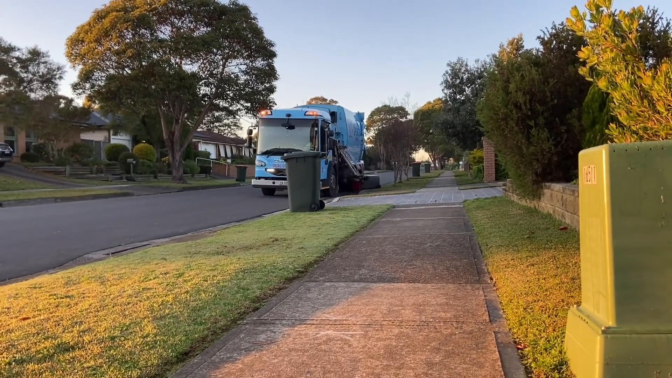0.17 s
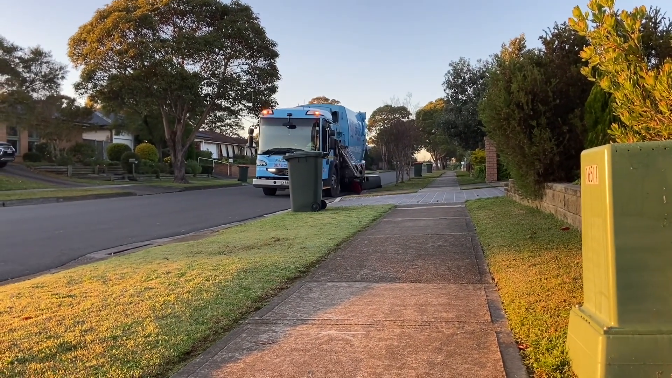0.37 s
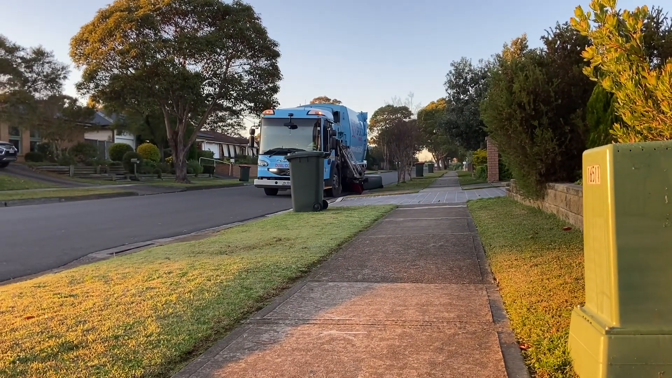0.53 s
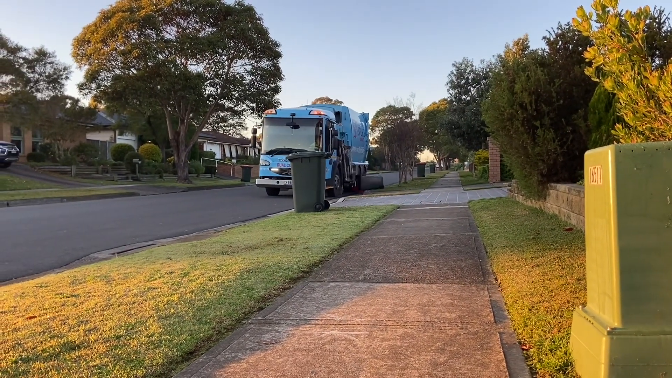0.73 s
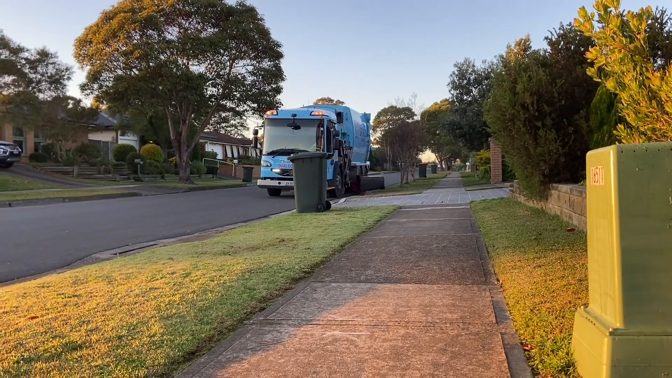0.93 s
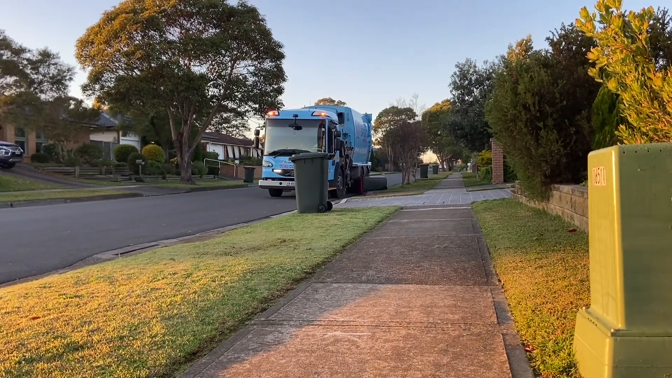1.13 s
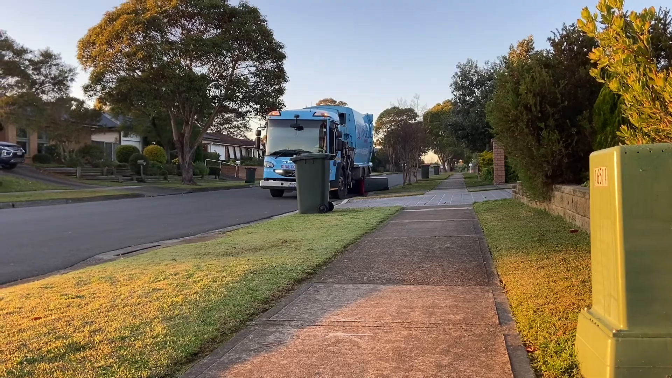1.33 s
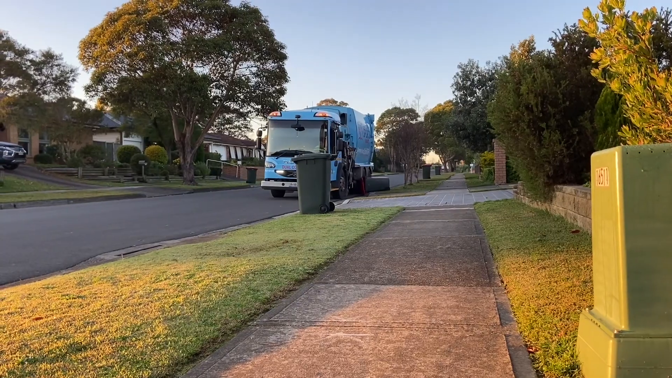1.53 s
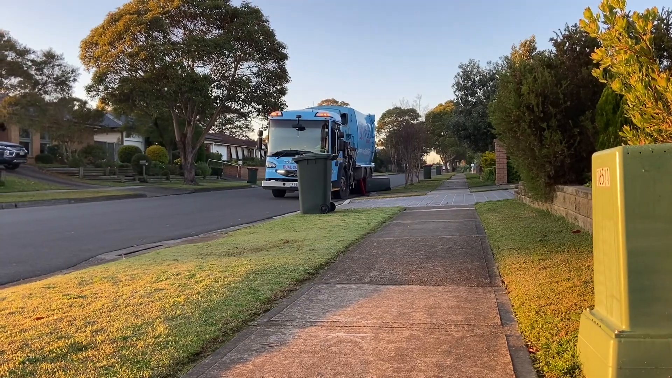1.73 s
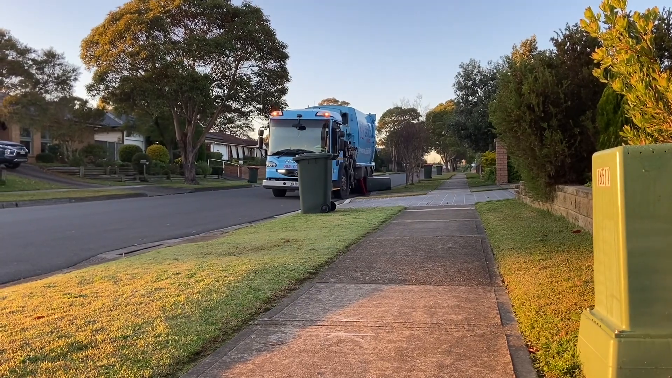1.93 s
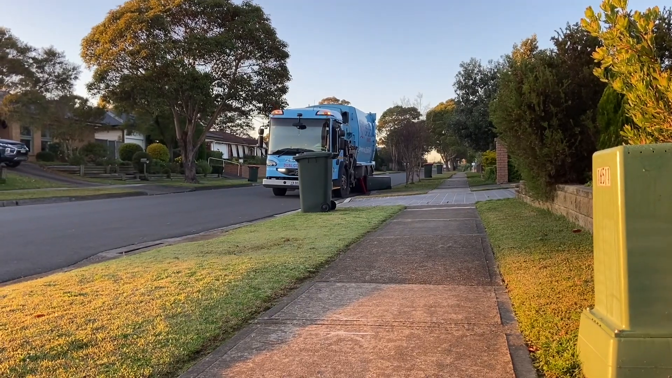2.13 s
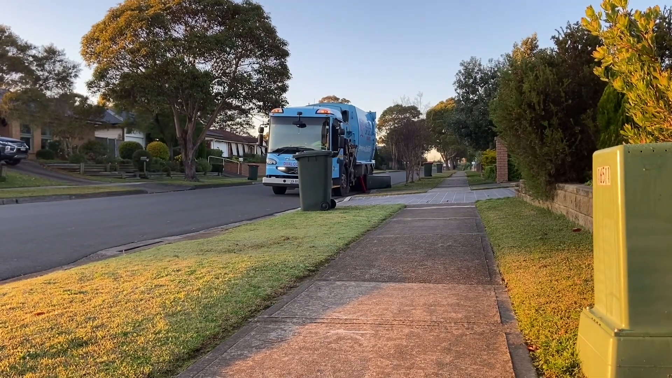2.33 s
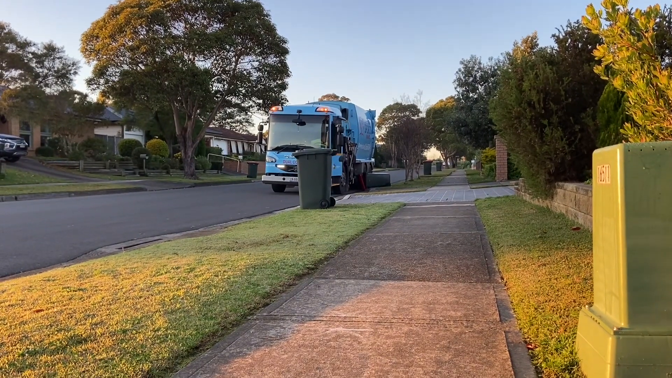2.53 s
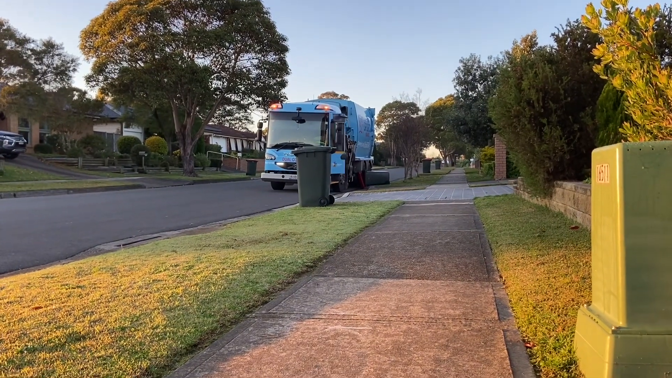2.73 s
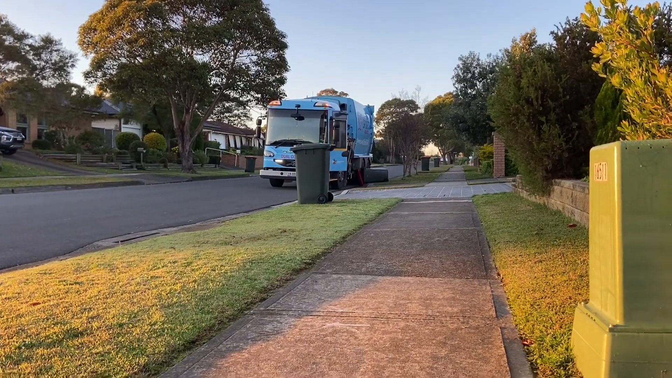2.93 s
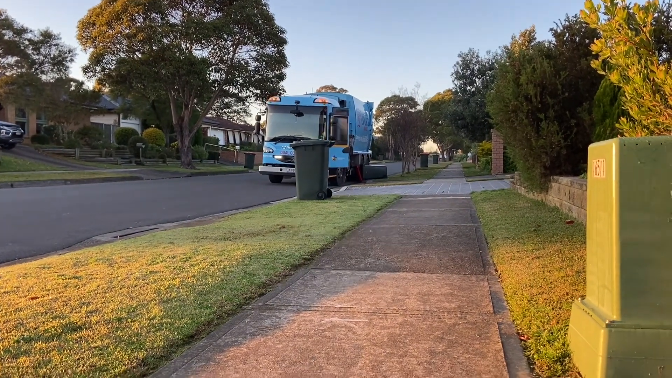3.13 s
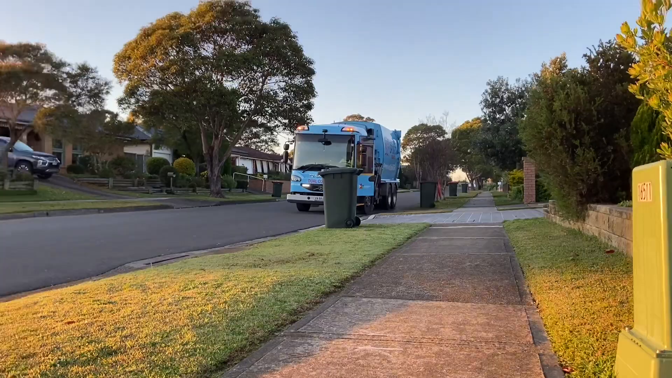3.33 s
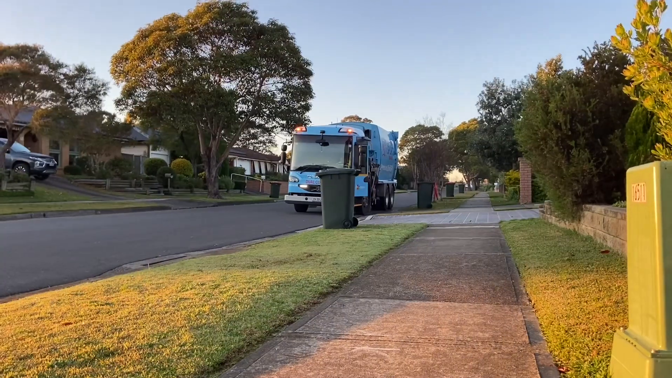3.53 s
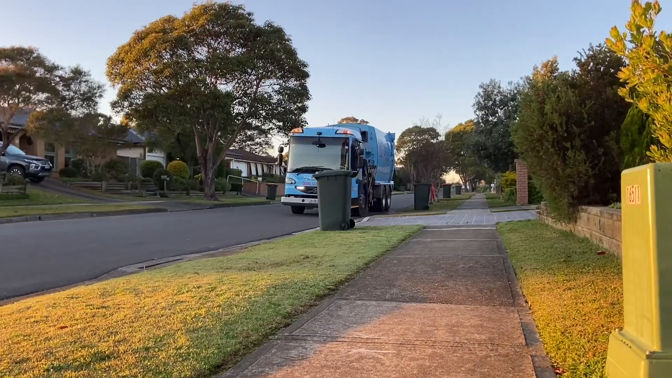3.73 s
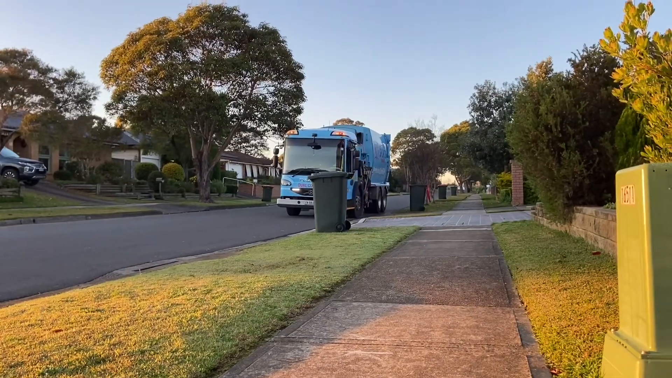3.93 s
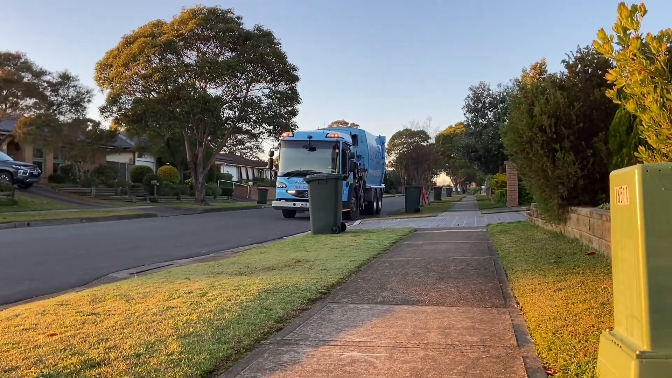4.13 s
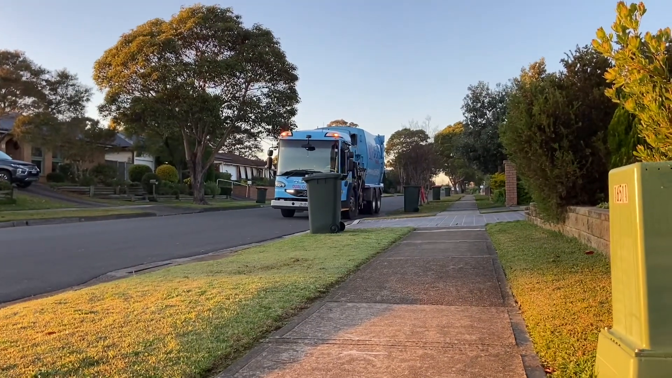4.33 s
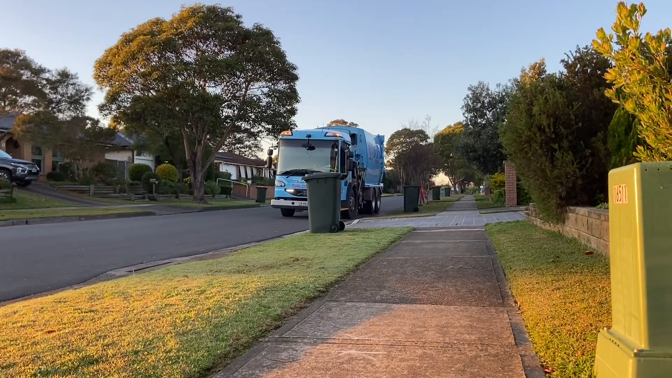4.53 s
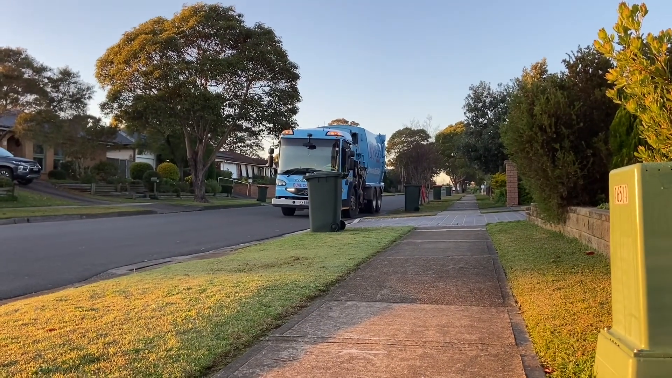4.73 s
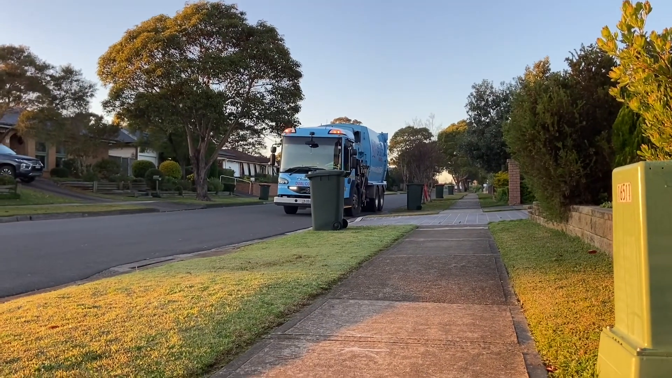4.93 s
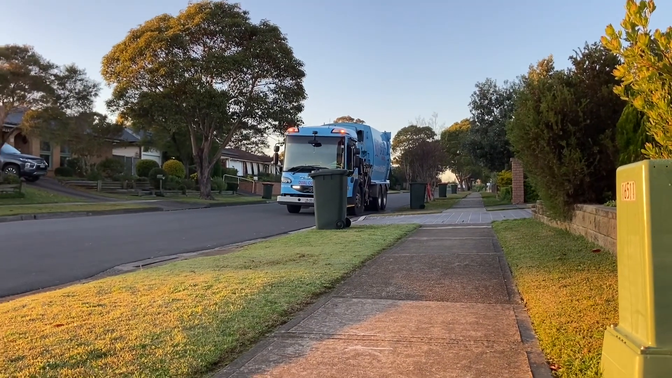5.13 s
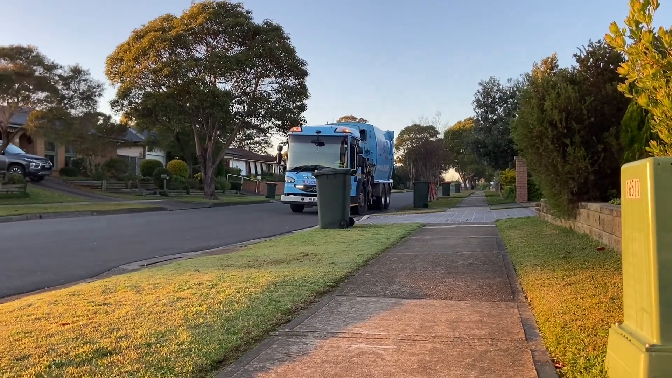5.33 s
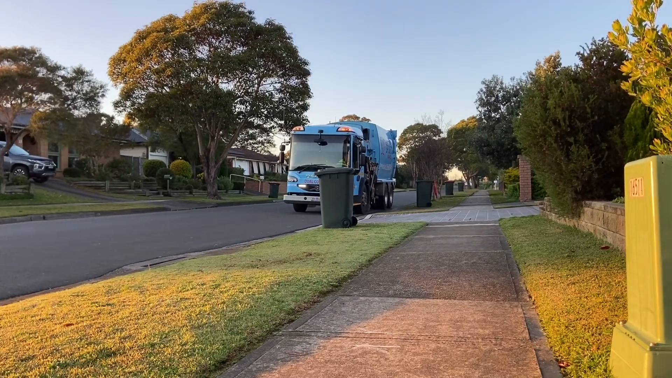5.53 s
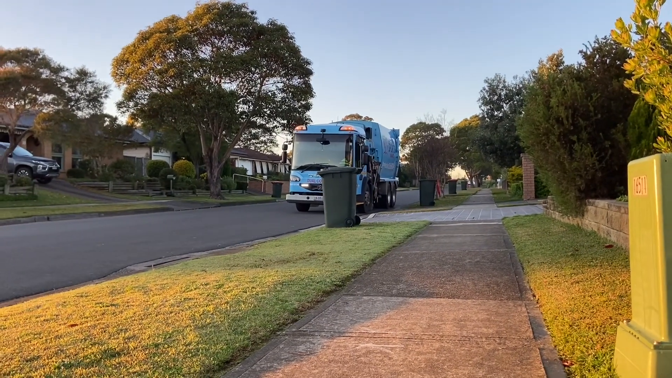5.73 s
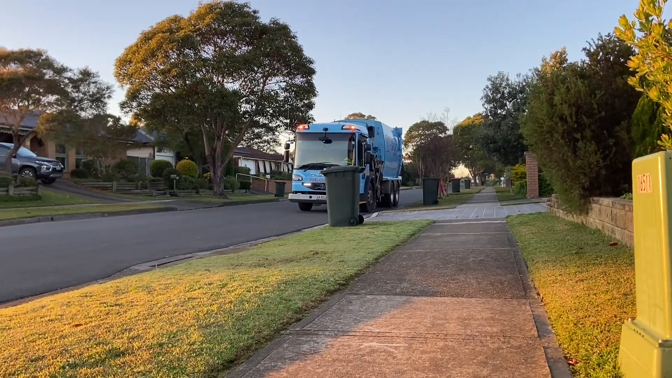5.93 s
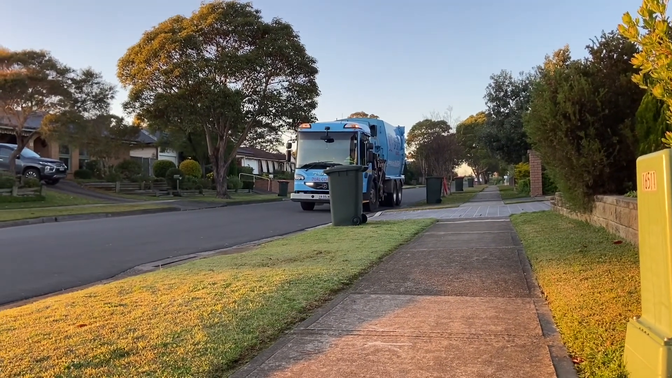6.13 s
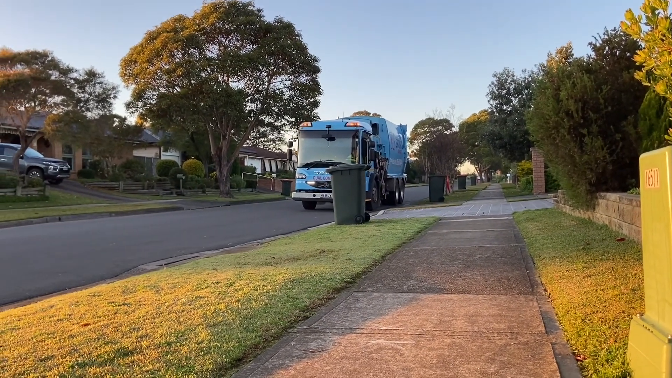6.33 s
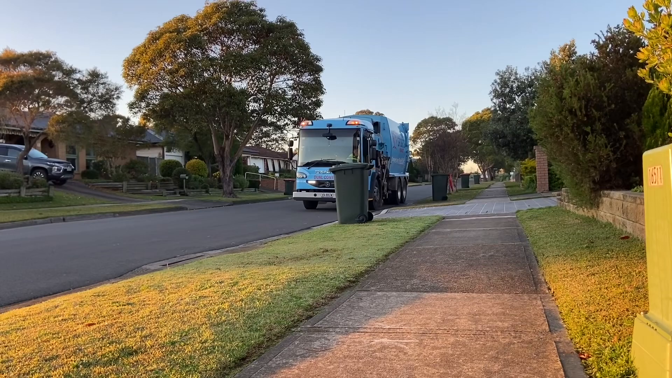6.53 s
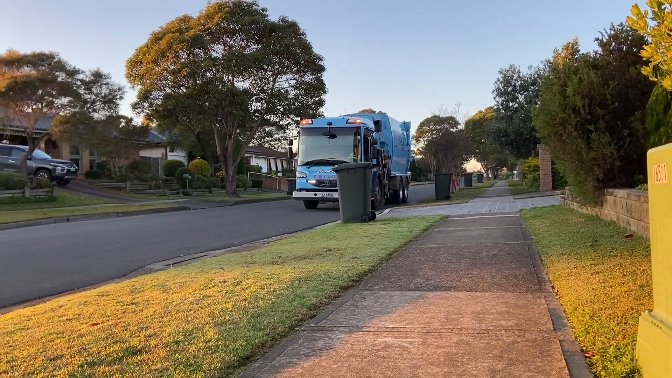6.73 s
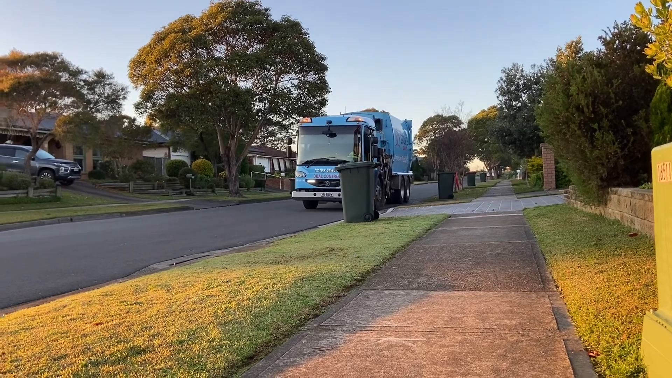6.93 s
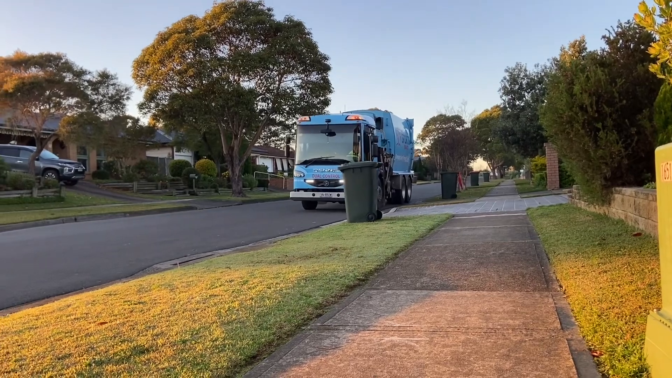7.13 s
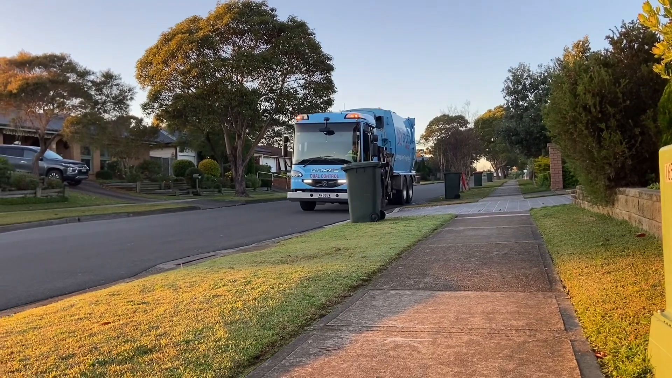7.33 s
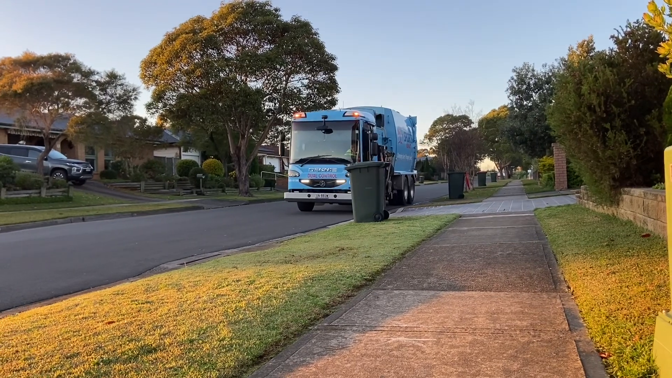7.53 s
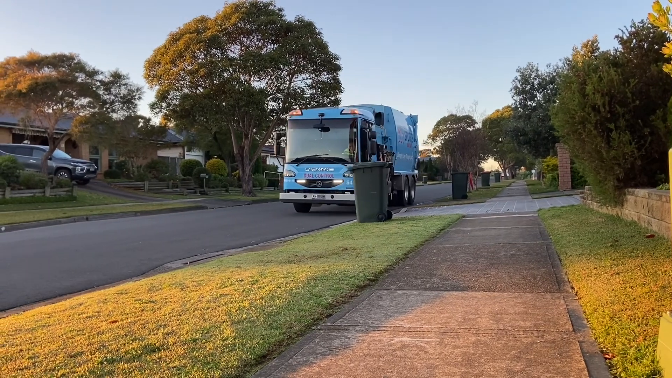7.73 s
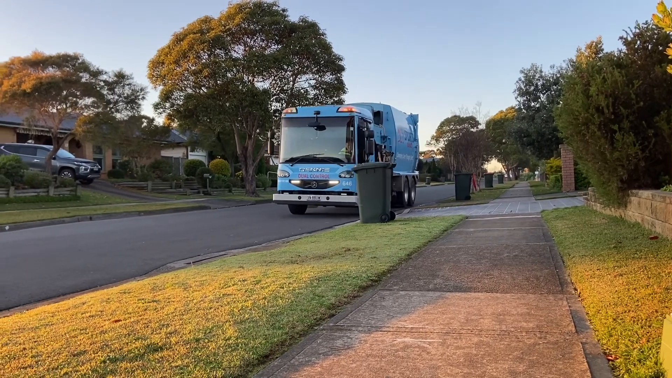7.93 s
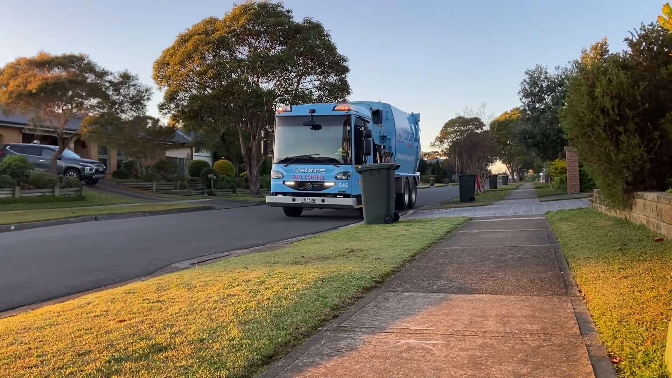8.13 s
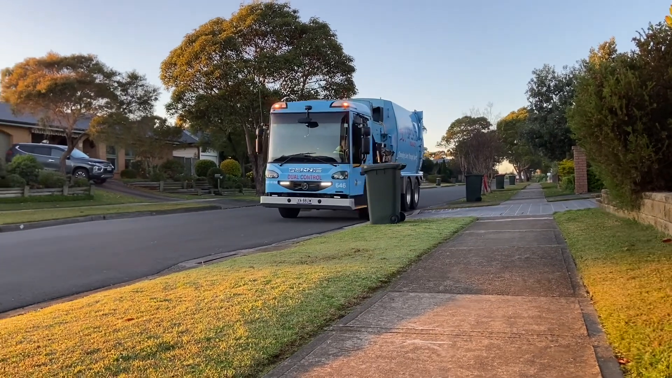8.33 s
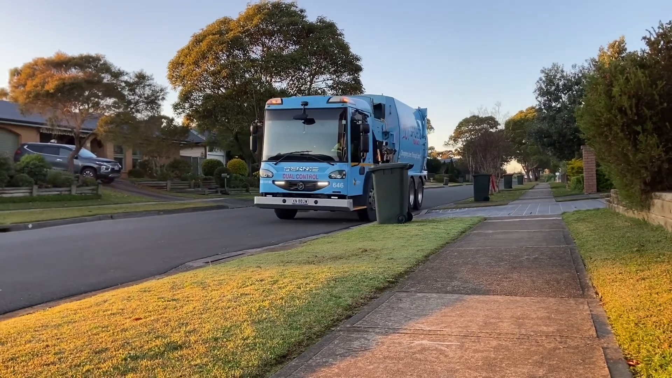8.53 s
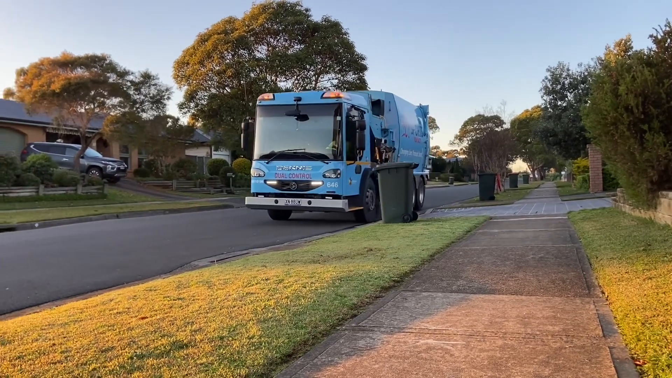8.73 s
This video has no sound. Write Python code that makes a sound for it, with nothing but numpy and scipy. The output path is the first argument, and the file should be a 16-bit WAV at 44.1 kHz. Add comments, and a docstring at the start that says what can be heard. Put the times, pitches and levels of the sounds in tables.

```python
"""Garbage truck at a suburban kerb

A diesel garbage truck works ahead of the microphone: a bin bangs and its load tumbles into the hopper,
an air valve vents, the arm latches, then the six-cylinder engine revs, pulls off and eases for the next stop.
Engine and machines are sines and filtered noise, air is shaped hiss, blows are noise and dying sines."""
import sys
import numpy as np
from scipy import signal
from scipy.fft import rfft, irfft
from scipy.io import wavfile
from scipy.ndimage import uniform_filter1d

SR = 44100
rng = np.random.default_rng(int(sys.argv[2]) if len(sys.argv) > 2 else 0)


def generate_wav(signal):
    """Clip the signal to [-1, 1] and save it as 16-bit WAV at the path in sys.argv[1]."""
    frames = np.transpose(np.atleast_2d(signal))
    scaled = np.clip(frames, -1, 1) * 32767
    pcm = np.round(scaled).astype(np.int16)
    wavfile.write(sys.argv[1], SR, pcm)


N = 391146
T = np.arange(N) / SR  # seconds

# The steel frame's ringing modes. Each row: frequency in Hz, relative level in dB, t60 in seconds.
FRAME_MODES = [(524, -8, .06), (599, 3.5, 0.063), (633, 3, 0.075), (685, 6, .05), (892, 4.5, 0.1),
               (988, 4, 0.098), (1078, 5, .05), (1106, -5, 0.036), (1317, 0, 0.054), (1480, -21, .05),
               (2320, -2.5, .06), (2820, -1, .06), (3320, -13, 0.039), (3700, 0, .045), (4130, -2, .035)]


def gain_of(db):
    """Decibels as an amplitude factor."""
    return 10 ** (np.asarray(db) / 20)


def evened(x):
    """The signal brought to an rms of 1."""
    return x / np.sqrt(np.mean(x ** 2) + 1e-20)


def read(points, hz):
    """A table of (Hz, value) read along a logarithmic frequency scale."""
    f, value = np.transpose(points)
    return np.interp(np.log(hz + 1), np.log(f + 1), value)


def curves(rows):
    """The columns of a table whose first is seconds, sample by sample."""
    s, *columns = np.transpose(rows)
    return [np.interp(T, s, c) for c in columns]


def window(rows, fade=0.019):
    """One while a table lasts, with short fades in seconds; a table from 0 s starts at once."""
    start, end = rows[0][0], rows[-1][0]
    already_on = (T < fade) * (start <= 0)
    return np.clip(np.minimum(T - start, end - T) / fade + already_on, 0, 1)


def hz_per_s(hz, size):
    """How fast a pitch glides, smoothed over size samples."""
    return uniform_filter1d(np.gradient(hz) * SR, size=size)


def colour(x, spectrum):
    """Filters to a spectrum that closes beyond its low end; rms 1."""
    hz = np.fft.rfftfreq(len(x), 1 / SR)
    lowest_hz = spectrum[0][0]
    shut = (hz > lowest_hz / 2) * np.minimum(1, (hz / lowest_hz) ** 4)
    return evened(irfft(rfft(x) * gain_of(read(spectrum, hz)) * shut, len(x)))


def drift(per_s):
    """Slow chance of rms 1, with per_s new values a second."""
    count = int(T[-1] * per_s) + 2
    values = rng.standard_normal(999)[:count]
    return evened(np.interp(T * per_s, np.arange(count), values))


def resonate(x, hz, width):
    """A resonance of gain 1 at hz, width in Hz."""
    turn = np.exp(2j * np.pi * np.cumsum(hz * np.ones(len(x))) / SR)
    r = np.exp(-np.pi * width / SR)
    return 2 * (turn * signal.lfilter([1 - r], [1, -r], x / turn)).real


def resonances(x, modes):
    """Parallel resonances, each evened before its level."""
    return sum(gain_of(db) * evened(resonate(x, hz, width)) for hz, width, db in modes)


def ring(modes):
    """Dying sines of a struck object."""
    t = T[:SR // 3]
    return sum(gain_of(db - 60 * t / t60) * np.sin(2 * np.pi * hz * t) for hz, db, t60 in modes)


def tone(hz, db, fuzz_hz, clean, waver_db):
    """A line that is part sine and part narrow noise, wavering in level."""
    turns = np.cumsum(hz) / SR
    # the noise envelope takes a new value at each step
    steps = np.cumsum(fuzz_hz * np.ones(N)) / SR
    count = int(steps[-1]) + 2
    a, b = (np.interp(steps, np.arange(count), v) for v in rng.standard_normal((count, 2)).T)
    sine = np.sin(2 * np.pi * turns)
    fuzz = evened(a * sine + b * np.cos(2 * np.pi * turns))
    return gain_of(db + waver_db * drift(11)) * (clean * np.sqrt(2) * sine + np.sqrt(1 - clean ** 2) * fuzz)


def exhaust(hz, turns, pulse_db):
    """Three harmonics of the firing rate pass the pipe, wavering and at times throbbing."""
    # What the pipe passes of each harmonic. Each row: frequency in Hz, gain in dB.
    pipe = [(36, -24), (44, -26.5), (55, -9), (74, -17), (79.5, -22), (83, -23.5), (87, -17), (92, -17),
            (104, -25.5), (114, -24.5), (125, -34), (148, -34.5), (180, -21.5), (200, -26), (222, -39),
            (245, -43), (280, -44)]
    # Throbs of the tone. Each row: start in seconds at a trough, end in seconds, throbs per second in Hz,
    # depth 0-1, harmonic number.
    throbs = [(5.043, 6.143, 3.7, 1, 2), (6.27, 7.993, 3.546, 0.3, 1)]
    # the overtones drop by up to 27 dB, in full once the firing rate falls by 37 Hz per second
    overrun_db = -27 * np.clip(-hz_per_s(hz, 1500) / 37, 0, 1)
    waver_db = 3 * np.clip(-pulse_db / 18, .2, 1)  # steadier when the pulses are strong
    out = np.zeros(N)
    for k in range(1, 4):
        level = gain_of(pulse_db + read(pipe, k * hz) + (k > 1) * overrun_db + waver_db * drift(11))
        for start, end, throb_hz, depth, harmonic in throbs:
            if harmonic == k:
                beat = np.exp(2j * np.pi * throb_hz * (T - start))
                level = level * abs(1 - depth * window([[start], [end]]) * beat)
        out += np.sqrt(2) * level * np.sin(2 * np.pi * k * turns + k)
    return out


def uneven_cylinders(hz, turns, roar_db):
    """Unequal cylinders sound at sixths of the firing rate, rising with load, through the casing."""
    # Orders. Each row: multiple of the firing rate, level in relative dB.
    orders = [(.8333, -16), (1.5, 0), (1.8333, -8), (2.3333, -5), (2.5, -6), (3.3333, -2.5), (3.5, -7.5),
              (4.0, -5), (4.3333, -11), (4.5, -6), (4.6667, -15.5), (5.0, -3), (5.5, -16), (6.0, -7.5),
              (6.5, -10.5), (7.0, -7), (7.5, -16), (8.0, -9.5), (8.3333, -16), (9.0, -13), (9.5, -11),
              (11.5, -19), (12.5, -21)]
    # What the casing radiates of them. Each row: frequency in Hz, gain in dB.
    casing = [(100, -7.5), (170, -3), (215, -1), (260, -0.5), (320, -9.5), (400, -0.5), (480, -4.5),
              (620, -4.5), (720, 0), (800, -8), (900, 0), (1000, 1), (1180, 10), (1500, -1), (2100, 4)]
    out = np.zeros(N)
    for k, db in orders:
        level = gain_of(roar_db + db + read(casing, k * hz) + .8 + 2.8 * drift(4))
        out += level * np.sin(2 * np.pi * (k * turns + 0.003 * k * drift(30)))
    return out


def rumble_and_roar(turns, roar_db):
    """Noise puffs with each firing, coloured as an idle rumble and as a roar under load."""
    # Spectra of rumble and roar. Each row: frequency in Hz, relative dB per Hz.
    idle_spectrum, roar_spectrum = [(22, -44), (36, 2.5), (106, -1), (344, -14), (816, -19), (1010, -19.5),
                                    (1210, -25.5), (3000, -35), (6650, -45), (8200, -105), (10800, -49.5),
                                    (15800, -107)], [(59, -37), (100, -7.5), (210, -9.5), (400, -11),
                                                  (687, -14), (1400, -22), (4720, -30.5), (6000, -34),
                                                  (7400, -30), (8370, -47), (10800, -40.5), (15800, -52)]
    # Valve-gear rings in the rumble, block resonances in the roar. Each row: frequency in Hz, width in Hz,
    # level in dB against the coloured noise.
    valve_gear, block = [(1308, 17, -37.5), (1890, 150, -46.5), (2740, 100, -36.5), (3400, 690, -51)], [(695, 55, -10.5), (2080, 83, -28)]
    # Rumble level. Each row: time in seconds, level in dB.
    rumble = [(0, -28), (2.2, -30), (3.3, -34.5), (3.45, -31), (5.9, -32), (6.05, -28), (7.2, -32),
              (8.1, -30.5), (8.87, -29.5)]
    # every firing has its own strength
    strength = gain_of(1.5 * rng.standard_normal(999))[turns.astype(int)]
    puffs = (1.8 + strength * np.exp(-(turns % 1) / .35)) * rng.standard_normal((2, N))
    idle = gain_of(.7 * drift(6)) * colour(puffs[0], idle_spectrum) + resonances(puffs[0], valve_gear)
    roar = colour(puffs[1], roar_spectrum) + resonances(puffs[1], block)
    return gain_of(curves(rumble)[0]) * idle + gain_of(roar_db + 0.38 * drift(6)) * roar


def engine():
    """One firing rate drives the exhaust, the uneven cylinders and the puffing noise."""
    # Each row: time in seconds, firings per second in Hz, exhaust pulse in dB ahead of the pipe,
    # roar under load in dB.
    engine_run = [(0, 40.96, -27, -41.5), (1.5, 41.7, -14, -45), (2.3, 42.17, -22.5, -44),
                  (2.62, 39.6, -7, -44), (2.85, 39.48, -21, -49.5), (3.3, 39.34, -17, -52),
                  (3.45, 40.8, -19.5, -50), (4.9, 39.4, -20, -48.5), (5.06, 36.96, -15, -47.5),
                  (5.98, 37.02, -11, -48.5), (6.2, 50.14, -3, -36), (6.37, 57.93, -8.5, -35.5),
                  (6.66, 67.57, -2, -33), (7.07, 76.75, 3, -32.5), (7.44, 82.97, -2, -31.5),
                  (7.7, 88.47, -1, -30.5), (7.86, 91.4, -1.5, -30), (7.91, 91.7, 3, -32),
                  (8.02, 80.36, 3.5, -34.5), (8.07, 75.5, -36, -34.5), (8.16, 67.6, -27, -35),
                  (8.32, 64.9, -17, -35.5), (8.57, 53.32, -28, -37.5), (8.87, 42, -14, -41.5)]
    hz, pulse_db, roar_db = curves(engine_run)
    turns = np.cumsum(hz) / SR
    out = exhaust(hz, turns, pulse_db) + uneven_cylinders(hz, turns, roar_db)
    return out + rumble_and_roar(turns, roar_db)


def body_hums():
    """Steady low drones of the drive and the body, each a slightly blurred line."""
    # Each row: start in seconds, end in seconds, first pitch in Hz, last pitch in Hz, level in dB.
    drones = [(0, 4.4, 112.5, 112.3, -38.5), (3.37, 5.2, 116.8, 117.6, -39),
              (1.2, 2.84, 227.6, 225.7, -44.5), (1.2, 2.57, 86, 85.1, -41.5), (3.45, 4.9, 78.5, 79, -38),
              (6.25, 7.44, 78.6, 79.6, -29), (8.1, 8.56, 77.32, 72.4, -34)]
    out = np.zeros(N)
    for start, end, first_hz, last_hz, db in drones:
        hz = np.interp(T, [start, end], [first_hz, last_hz])
        out += window([[start], [end]], fade=.05) * tone(hz, db, fuzz_hz=14, clean=.8, waver_db=1.5)
    return out


def hydraulic_pump():
    """The pistons hum at their rate, at 1.5 times and at twice it; higher lines are more blurred."""
    # Each row: time in seconds, piston rate in Hz, level in dB, level at twice the rate in dB.
    pump_run = [(0, 280, -52, -42.5), (2.4, 281.9, -70, -46), (2.7, 269.6, -47.5, -50),
                (3.36, 252, -43.5, -48), (3.375, 286.6, -45, -60), (3.7, 285.2, -49, -42),
                (4.3, 286.4, -52.5, -47), (4.45, 284, -59, -53), (4.65, 282.7, -57, -43.5),
                (4.87, 281.6, -48, -44.5), (4.93, 270, -58, -61), (5.03, 249, -43, -54),
                (5.9, 248, -39, -55), (6.05, 253, -45, -64)]
    hz, db, twice_db = curves(pump_run)
    out = np.zeros(N)
    for k, line_db in enumerate([db, -53.5, twice_db]):
        out += tone(hz * (k + 2) / 2, line_db, fuzz_hz=15 * (k + 1), clean=.9 - .12 * k, waver_db=1.2)
    return window(pump_run) * out


def fan():
    """A fan's noisy band near 1 kHz."""
    # Each row: time in seconds, frequency in Hz, level in dB.
    fan_run = [(0, 1032, -46), (3.3, 1014, -50), (6.0, 1005, -50), (6.3, 1088, -46), (7.3, 1116, -46),
               (8.0, 1082, -42), (8.87, 1040, -76)]
    return tone(*curves(fan_run), fuzz_hz=91.4, clean=0.3, waver_db=1.0)


def turbocharger():
    """A breathy whistle that blurs more the faster its pitch glides."""
    # One table a glide. Each row: time in seconds, frequency in Hz, level in dB.
    glides = [
        [(0, 6700, -61), (1, 6320, -62), (2.2, 5900, -62), (2.72, 5670, -63), (2.9, 5540, -69),
         (3.35, 5150, -70)],
        [(5.1, 4570, -65), (5.3, 4570, -62), (5.65, 4580, -64), (6.0, 4620, -61), (6.15, 5200, -57),
         (6.5, 7000, -55), (7.3, 10700, -57), (7.7, 12400, -59), (7.88, 13200, -62), (8.05, 12300, -63),
         (8.3, 10700, -64), (8.87, 8200, -72)],
        [(8.17, 6700, -63), (8.32, 6150, -55), (8.53, 5550, -55), (8.8, 5000, -66)],
    ]
    still_width_hz, spool_up_s, spool_down_s = 65, .15, .04  # the blur adds the Hz glided in these times
    out = np.zeros(N)
    for rows in glides:
        hz, db = curves(rows)
        glide = hz_per_s(hz, 4000)
        width = still_width_hz + np.maximum(spool_up_s * glide, -spool_down_s * glide)
        out += window(rows, fade=.08) * tone(hz, db, width, clean=55 / width, waver_db=1.0)
    return out


def tumble():
    """Many small blows of uneven size drum the hopper and rattle on it, dying away after each landing."""
    # Load landing or sliding in the steel hopper. Each row: time in seconds, build-up in seconds ahead of
    # each layer's own, then boom, clatter and fine rattle in dB.
    landings = [(.11, 0.022, -19.5, -31, -38), (.243, 0.0017, -5.5, -14.5, -26),
                (.315, 0.0091, -9, -15, -28.5), (.44, 0.014, -17, -24.5, -50),
                (.465, 0.0069, -22, -34, -37), (0.649, 0.013, -24, -25.5, -41),
                (.71, 0.033, -11, -22.5, -32.5), (.75, .02, -24, -29, -50), (.79, 0.0098, -15.5, -28, -37),
                (.865, 0.052, -16, -26.5, -35), (.955, 0.035, -12.5, -19, -27.5),
                (1.03, 0.061, -25, -19.5, -25), (1.1, 0.005, -21, -24.5, -27),
                (1.19, 0.025, -20.5, -29.5, -38), (1.3, 0.025, -29, -54, -54),
                (3.855, 0.014, -24.5, -37, -39), (3.92, .03, -25, -52, -61)]
    # Boom, clatter, rattle. Each row: added build-up in seconds, t60 in seconds.
    layer_times = [(0.042, 0.65), (0.013, 0.51), (.001, 0.48)]
    # Hopper resonances. Each row: frequency in Hz, width in Hz, relative level in dB.
    hopper = [(81.8, 7.6, 5), (109, 13, 3), (147.4, 7.8, 5.5), (184, 32, 6), (213.6, 14, -0.5),
              (264, 5.8, -0.5), (323, 51, -44)]
    # Spectra of the two upper layers. Each row: frequency in Hz, relative dB per Hz.
    clatter, rattle = [(330, 16), (480, 10), (700, 5.5), (1050, 3.5), (1400, -14), (1750, -39)], [(1400, 8.5), (2000, 2), (3200, 3.5), (5000, -5), (8000, -14),
                                        (15500, -106)]
    sizes = gain_of(2.5 * np.minimum(rng.exponential(1, N), 4))
    blows = sizes * rng.choice([-1, 1], N) * (rng.random(N) < 900 / SR)  # about 900 a second
    blows = evened(blows) + 0.75 * rng.standard_normal(N)
    boom = evened(resonances(blows, hopper))
    # the frame rings too
    metal = .6 * evened(sum(resonate(blows, f, 5 / t60) / np.sqrt(2.2 / t60) for f, _, t60 in FRAME_MODES))
    boom = colour(boom, [(60, 2.5), (350, -1.5), (700, -33)])
    layers = boom, colour(blows + metal, clatter), colour(blows + metal, rattle)
    power, t = np.zeros((3, N)), T[:SR]
    for s, build, *levels_db in landings:
        for k, (rise, t60) in enumerate(layer_times):
            swell = np.minimum(t / (build + rise), 1)
            power[k, round(s * SR):][:SR] += (swell * gain_of(levels_db[k] - 60 * t / t60)) ** 2
    return (np.sqrt(power) * layers).sum(0)


def knocks():
    """Each sharp knock of metal and plastic is a bright tick, a crack and a ring of the steel frame."""
    # Each row: time in seconds, then crack, ring and bright tick in relative dB, and the frequency in Hz
    # near which the struck spot favours modes.
    blows = [(0.113, -25, -21, -49, 970), (0.2439, -11, -10, -32.5, 870), (0.2660, -31, -7.5, -43, 900),
             (0.3176, -30, -7, -44, 655), (0.339, -21, -7, -43, 692), (0.3517, -31, -10, -46, 673),
             (0.4727, -22, -18, -64, 885), (0.7102, -25, -24, -51, 1050), (0.7314, -34, -14.5, -52, 1080),
             (0.7978, -24, -23, -47, 563), (0.8643, -24, -39, -53, 1170), (0.8802, -21, -37, -45, 643),
             (0.9776, -24, -17, -50, 930), (0.981, -32, -17, -55, 2600), (0.9978, -24, -24, -53, 550),
             (1.014, -30, -13, -56, 2400), (1.0356, -20, -16, -42, 4100), (1.054, -27.5, -15, -55, 3500),
             (1.068, -34, -22, -56, 2500), (1.1018, -14, -8, -38, 1100), (1.1180, -40, -13, -50, 1200),
             (1.1397, -37, -17, -47, 1070), (1.151, -35, -20, -59, 2400), (1.171, -34, -22, -57, 3700),
             (1.189, -34, -21, -60, 3500), (1.214, -35, -27, -59, 2900), (1.236, -32, -26, -60, 3600),
             (1.7244, -39, -28, -66, 557), (1.8245, -32, -44, -57, 589), (1.8593, -34, -25, -64, 589),
             (3.8386, -25.5, -44, -50, 792), (3.8665, -27, -21.5, -48, 630), (3.8812, -40, -33, -52, 649),
             (3.9008, -38, -26, -55, 581.2)]
    # Noise spectra. Each row: frequency in Hz, relative dB per Hz.
    crack_spectrum, tick_spectrum = [(1200, 5), (2500, 6), (5000, 0.5), (8000, -4), (11000, -71)], [(4000, -23), (7000, -17), (11000, 15), (15500, -2)]
    detune = .025  # each blow bends the modes by up to this share
    noise = colour(rng.standard_normal(N), crack_spectrum)
    fizz = colour(rng.standard_normal(N), tick_spectrum)
    chance = rng.uniform(-1, 1, (len(blows), len(FRAME_MODES), 2))
    out, t = np.zeros(N), T[:SR // 3]
    for (s, crack_db, ring_db, tick_db, spot_hz), vary in zip(blows, chance):
        modes = []
        for (f, db, t60), (v, bend) in zip(FRAME_MODES, vary):
            octaves_off = min(abs(np.log2(f / spot_hz)), 1.4)
            modes.append((f * (1 + detune * bend), db + 3 * v - 15 * octaves_off, t60))
        at = round(s * SR)
        crack = noise[at:at + len(t)] * gain_of(crack_db - 12.5 - 60 * t / 0.094)
        tick = fizz[at:at + len(t)] * gain_of(tick_db - 5.5 - 60 * t / 0.074)
        rise = np.minimum(t / .001, 1)
        out[at:at + len(t)] += (crack + tick + gain_of(ring_db - 12.0) * ring(modes)) * rise
    return out


def hollow_thumps():
    """Soft blows ring the hollow bin or, deep and low, the hopper, each at its own pitch."""
    # Each row: time in seconds, relative level in dB, pitch as a factor on the hollow modes.
    thumps = [(.264, -2, 1.06), (.284, -10.5, 0.92), (.299, -6.5, 1.0), (.3, -13, 0.3), (.318, -10.5, 1.07),
              (.336, -10, 0.5), (.362, -12, 0.7), (.662, -2.5, 1.01), (.682, -14, 1.05), (.74, -16, 0.37),
              (1.08, -12.5, 0.42), (1.23, -11.5, 0.42), (1.287, -12.5, 0.38), (1.353, -17, 0.39),
              (3.871, -22, 0.26), (3.91, -16.5, 0.23)]
    # The hollow modes. Each row: frequency in Hz ahead of that factor, relative level in dB, t60 in seconds.
    hollow_modes = [(224.4, 3.5, 0.37), (263, 11, 0.076), (138, -34, .2), (468, 1.5, 0.044)]
    out = np.zeros(N)
    for s, db, pitch in thumps:
        # a soft blow builds over some ms
        thump = ring([(f * pitch, b, t60) for f, b, t60 in hollow_modes]) * np.minimum(T[:SR // 3] / 0.0062, 1)
        out[round(s * SR):][:len(thump)] += gain_of(db - 10.0) * thump
    return out


def brake_and_arm_squeals():
    """Thin gliding squeals of the brakes and the arm swell and fade as half sines."""
    # Each row: start in seconds, length in seconds, first pitch in Hz, last pitch in Hz,
    # level in dB ahead of the swell, clean share 0-1.
    squeals = [(1.055, .045, 2950, 3300, -44, .4), (1.12, .062, 3320, 3370, -39.5, .9),
               (1.19, .055, 2820, 3100, -46, .5), (1.255, .093, 3130, 3310, -45, .65),
               (1.352, .02, 3230, 3230, -52, .5), (4.87, .09, 3500, 3450, -60, .2),
               (5.332, 0.14, 11540, 11540, -69, .65), (5.663, 0.46, 10990, 10920, -66, .65),
               (7.086, 0.11, 5797, 5920, -52, .65)]
    out = np.zeros(N)
    for start, length, first_hz, last_hz, db, clean in squeals:
        u = np.clip((T - start) / length, 0, 1)
        swell = np.sqrt(abs(np.sin(np.pi * u))) * (u < 1)
        out += swell * tone(first_hz + (last_hz - first_hz) * u, db, fuzz_hz=200, clean=clean, waver_db=1.5)
    return out


def vents():
    """Compressed air jets swell and fade: brightest at first, duller as pressure falls."""
    # Air let off. Each row: start in seconds, length in seconds, level in dB, nozzle whistle in dB
    # against the jet.
    releases = [(2.124, 0.79, -43, -29), (4.862, 0.19, -61, 7.5)]
    # Nozzle resonances. Each row: frequency in Hz, width in Hz, relative level in dB.
    nozzle = [(3430, 310, 2), (6150, 230, -5)]
    # Spectra of the jet and its highest hiss. Each row: frequency in Hz, relative dB per Hz.
    jet, jet_top = [(900, -15), (1400, -3.5), (2800, -1.5), (4000, 1.5), (5200, -4.5), (7600, -9),
                    (10000, -37)], [(4500, -5), (6400, 4), (7500, 11.5), (9000, -7), (11000, 4.5),
                                 (15500, -4.5)]
    peak, tail = 0.26, .35  # shares of the length: when it is loudest, and the last part, in which it dies out
    low, top = colour(rng.standard_normal(N), jet), colour(rng.standard_normal(N), jet_top)
    whistle = evened(resonances(low, nozzle))
    out, flutter = np.zeros(N), gain_of(.7 * drift(40))
    for start, length, db, whistle_db in releases:
        u = np.clip((T - start) / length, 0, 1)
        shape_db = -9.5 * np.where(u < peak, 1 - u / peak, (u - peak) / (1 - peak)) ** 2
        top_db = 6.5 - 28.5 * u  # highest hiss against the jet
        air = low + gain_of(top_db) * top + gain_of(whistle_db) * whistle
        gate = window([[start], [T[-1]]]) * np.minimum((1 - u) / tail, 1)
        out += gate * gain_of(db + shape_db) * flutter * air
    return out


def gear_whine():
    """Gear teeth sing as the truck rolls: a cluster of lines around a main one."""
    # Each row: time in seconds, main line in Hz, level in dB.
    whine_run = [(6.4, 1340, -60), (6.66, 1535, -55), (6.9, 1668, -49), (7.2, 1797, -49.5),
                 (7.4, 1862, -47.5), (7.55, 1933, -46), (7.7, 2011, -44), (7.8, 2060, -46),
                 (7.93, 2000, -44.5), (8.03, 1760, -46), (8.14, 1590, -47.5), (8.3, 1480, -52),
                 (8.45, 1350, -60)]
    # Lines. Each row: ratio to the main line, blur in Hz, clean share 0-1 under load, level in dB against the
    # main line at full speed, dB gained per 100 Hz of the main line, dB gained while it falls.
    meshes = [(.581, 40, .85, -14, -4.2, -7), (.93, 200, .2, -9, 1, 0), (1, 110, .78, 0, 0, 0),
              (1.045, 200, .3, -6, .8, 0), (1.075, 120, .5, -5, .6, -3)]
    hz, db = curves(whine_run)
    slack = np.clip(-hz_per_s(hz, 1500) / 450, 0, 1)  # unloaded teeth rattle: the lines blur
    out = np.zeros(N)
    for ratio, blur_hz, clean, line_db, slope, slack_db in meshes:
        level_db = db + line_db + slope * (hz - hz.max()) / 100 + slack_db * slack
        out += tone(ratio * hz, level_db, blur_hz, clean * (1 - .2 * slack), waver_db=.8)
    return window(whine_run, fade=.1) * out


def street(x):
    """Echoes from house fronts: sparse taps of random sign, the bass lasting longest."""
    taps = np.zeros((2, SR // 2))
    at = np.arange(400, SR // 2 - 20, 20) + rng.integers(0, 20, (2, (SR // 2 - 401) // 20))
    np.put_along_axis(taps, at, rng.choice([-1., 1.], at.shape), 1)
    hz, t, z = signal.stft(taps, SR, nperseg=256)
    t60 = read([(200, 1.0), (1000, 0.18), (8000, 0.31)], hz)[:, None]
    tail = signal.istft(z * gain_of(-60 * t / t60), SR, nperseg=256)[1]
    return signal.fftconvolve(x[None], tail / np.linalg.norm(tail[0]), axes=1)[:, :N]


def scene():
    """The truck ahead, with scattered sound that differs between left and right, and echoes of the blows."""
    # What is added on the left and taken from the right. Each row: frequency in Hz, lean to the left -1..1,
    # share a quarter turn ahead, scattered sound in dB.
    width = [(40, .08, 0, -28), (100, .095, 0, -23), (200, .1, 0, -18), (400, .05, -.12, -16),
             (1000, -.03, -.1, -8), (2200, .12, .15, -10), (4000, .0, 0, -13), (7300, .0, .1, -12),
             (8300, .0, 1.15, -4), (15000, .0, 1.1, -4)]
    hits = knocks() + hollow_thumps()
    machinery = body_hums() + hydraulic_pump() + fan() + turbocharger() + brake_and_arm_squeals() + gear_whine()
    near = engine() + machinery + vents() + tumble() + hits
    hz = np.fft.rfftfreq(N, 1 / SR)
    f, lean, ahead, scatter_db = np.transpose(width)
    smear = rfft(rng.standard_normal(SR // 2) * gain_of(-60 * T[:SR // 2] / .6), N)
    scatter = gain_of(read(np.c_[f, scatter_db], hz)) * smear / abs(smear)  # only the phase is random
    side = read(np.c_[f, lean], hz) + 1j * read(np.c_[f, ahead], hz) + scatter
    return near + irfft(rfft(near) * side, N) * np.array([[1], [-1]]) + gain_of(-23.5) * street(hits)


def record(dry):
    """The microphone drops the deepest bass; one brief dip; loud peaks are rounded off; then the band limit."""
    # The sound fades out and back in: middle in seconds, half length in seconds.
    dip_s, dip_half_s = 3.368, .022
    edge_hz = 15830
    thinned = signal.sosfilt(signal.butter(2, 27, "high", fs=SR, output="sos"), dry)
    dipped = thinned * np.clip(abs(T - dip_s) / dip_half_s, 0, 1)
    rounded = dipped / (1 + abs(dipped / .95) ** 4) ** .25
    low_pass = signal.firwin(511, edge_hz, window=("kaiser", 9), fs=SR)
    return signal.oaconvolve(rounded, low_pass[None], "same")


dry = scene()
out = record(dry)
generate_wav(out)
```